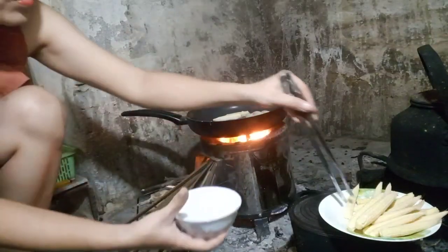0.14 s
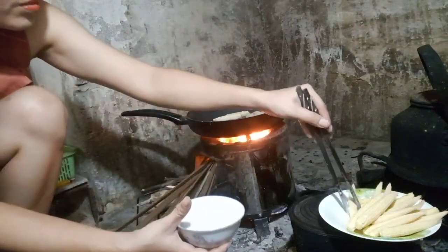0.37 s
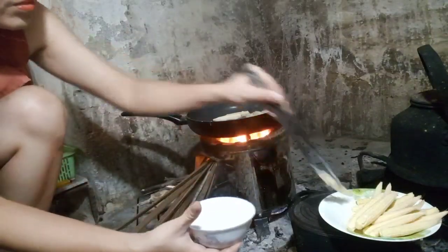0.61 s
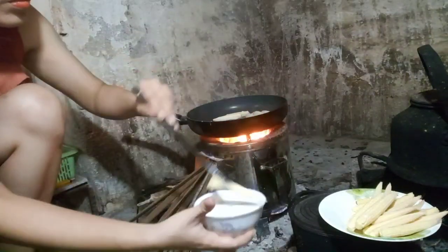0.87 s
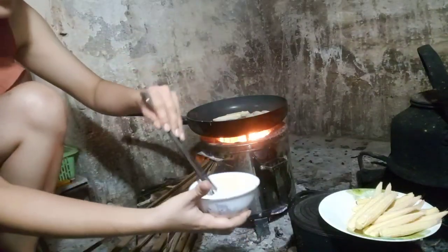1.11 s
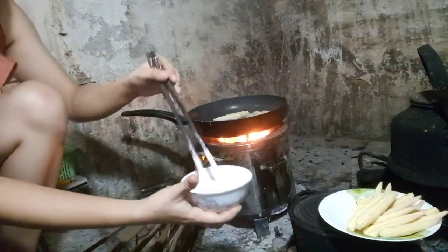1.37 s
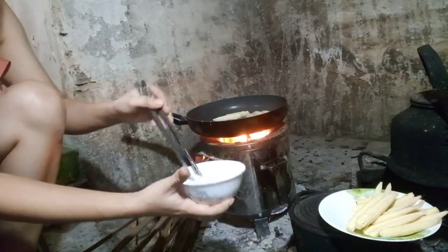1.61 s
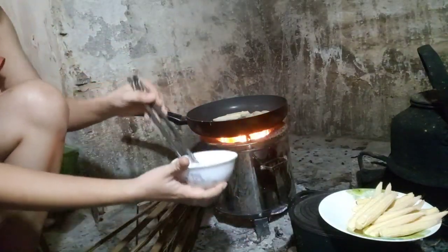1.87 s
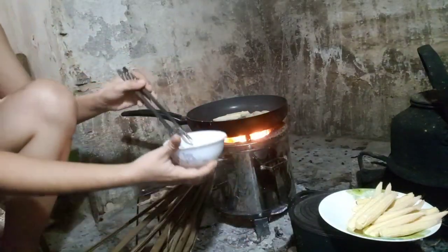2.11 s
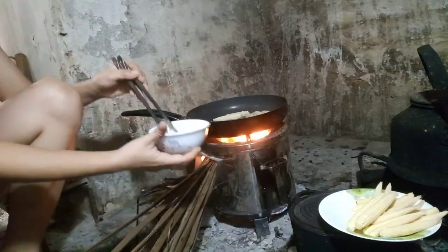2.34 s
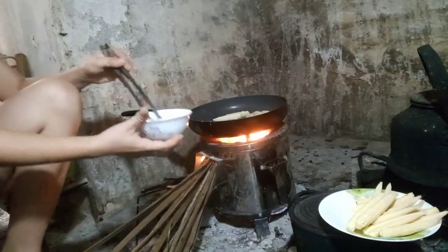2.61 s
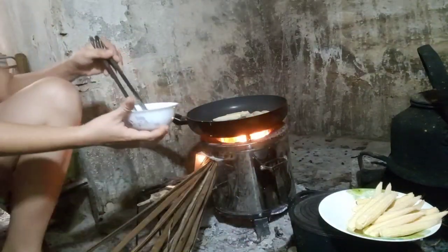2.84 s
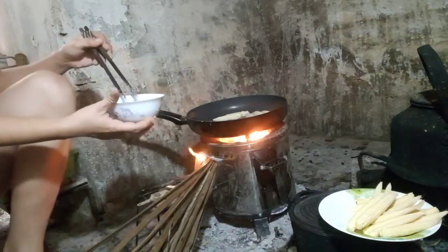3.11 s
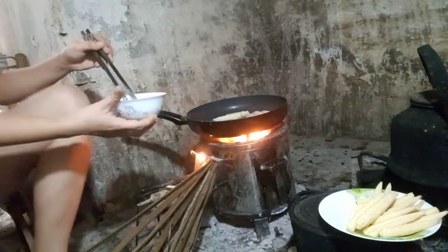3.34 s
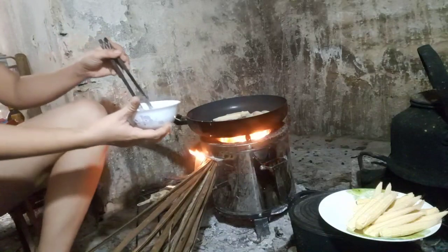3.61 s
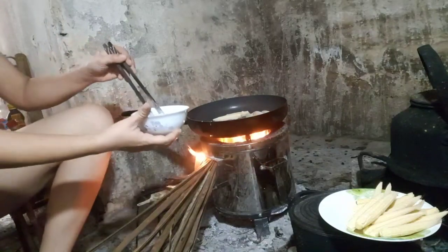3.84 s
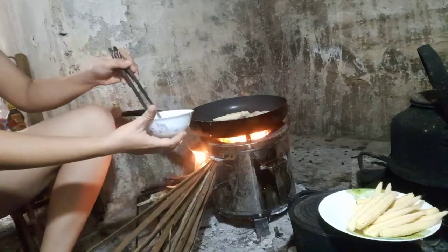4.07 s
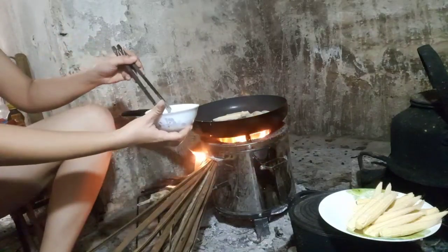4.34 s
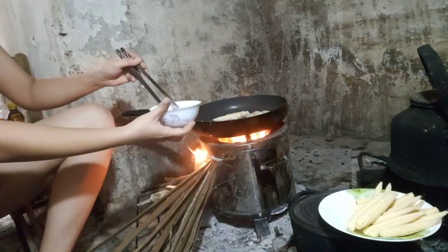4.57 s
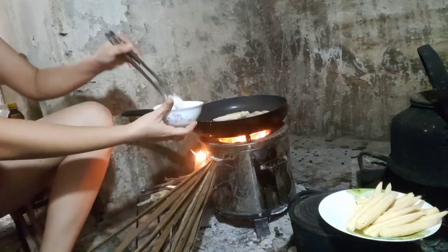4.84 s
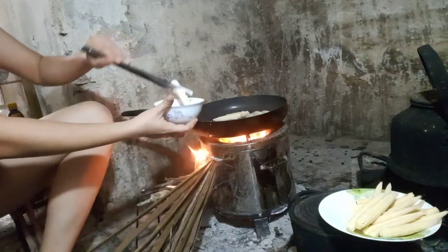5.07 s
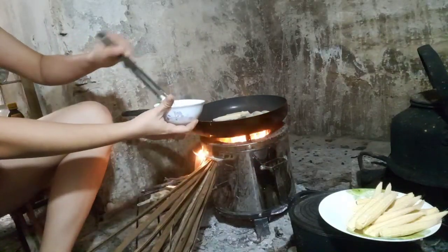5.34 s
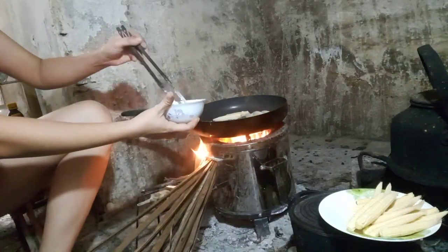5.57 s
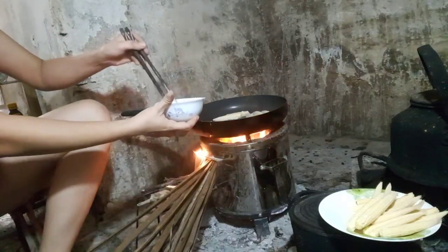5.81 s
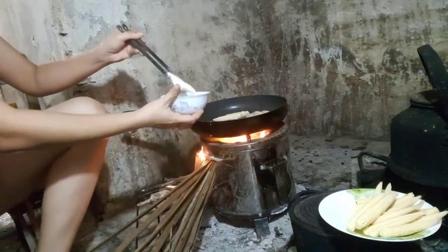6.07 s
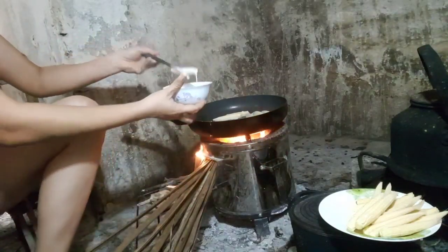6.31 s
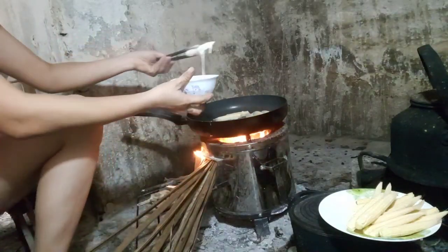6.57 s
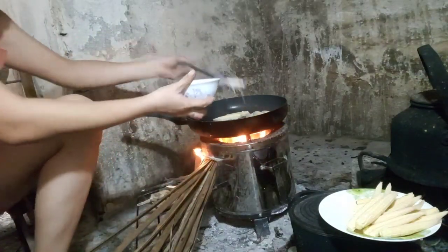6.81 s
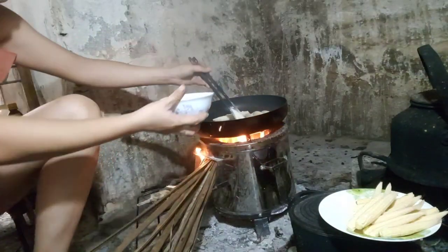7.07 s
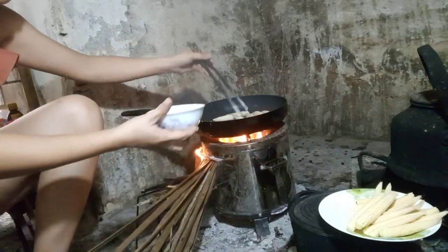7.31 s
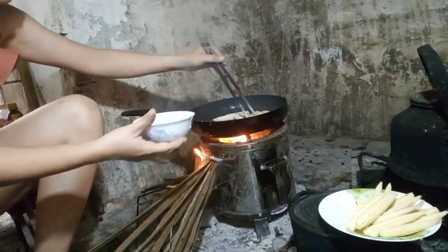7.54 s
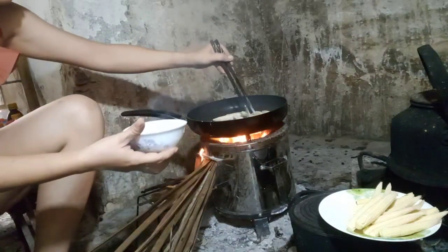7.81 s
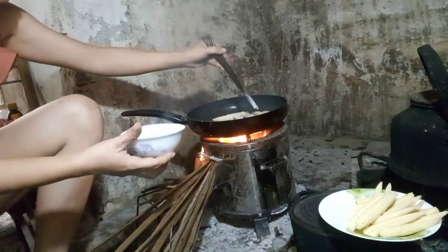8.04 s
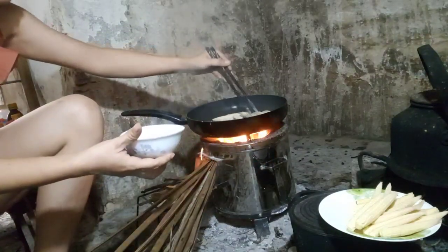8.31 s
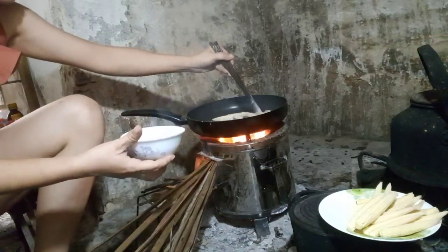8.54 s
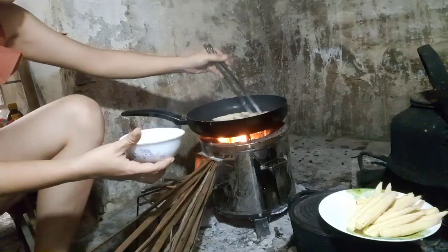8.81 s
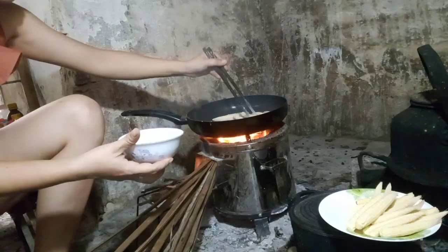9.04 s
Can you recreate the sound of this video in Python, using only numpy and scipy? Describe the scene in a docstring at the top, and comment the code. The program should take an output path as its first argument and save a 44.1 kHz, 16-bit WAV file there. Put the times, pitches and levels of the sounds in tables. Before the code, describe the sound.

A pan of battered food fries over a wood stove in a hard-walled corner, heard close in stereo with slight reverberation. The fire rumbles strongest at first, then sinks to a faint murmur. Early dull knocks, short scrapes and a bowl tap give way to steady sizzling and random spits. After seven seconds fresh batter makes the oil surge, with pan knocks and a very sharp pop just past eight seconds.

```python
"""Battered vegetables fry in a pan on a wood stove in a bare corner: bubbles burst as noise spits with
ringing cavities, large ones as single pops, small ones as sizzle and crackle over a noise hiss.
Chopsticks knock the pan, tap a bowl and scrape, as damped tones and resonances struck by noise.
The fire's draught rumbles and roars as shaped noise over a deep murmur; low sine tones waver as a hum."""
import sys
import numpy as np
from scipy import signal
from scipy.fft import rfft, irfft
from scipy.io import wavfile
from scipy.ndimage import uniform_filter1d

SR = 44100
rng = np.random.default_rng(int(sys.argv[2]) if len(sys.argv) > 2 else 0)


def voltage_ratio(level):
    """Linear amplitude factor for a level in decibels (scalar or array-like)."""
    return 10 ** (np.asarray(level, float) / 20)


def transcribe(u):
    """Save the signal u as a 16-bit wav file named by the first command-line argument.

    u: samples, shape (n,) or (channels, n), limited to [-1, 1]; the rate is SR.
    q: integer samples, one column per channel.
    """
    v = np.clip(np.atleast_2d(u).T, -1, 1)
    q = np.round(v * 32767).astype(np.int16)
    wavfile.write(sys.argv[1], SR, q)


N = 403956

# Large bubbles bursting. Each row: start in seconds, peak in dB before reflections, cavity pitch in Hz,
# left-right difference in dB, share of cavity ring 0-1.
LARGE_BUBBLES = [(0.015, -28, 12200, -4, 0.3), (0.055, -28, 14500, -4, .05), (0.183, -21, 4070, 0, 1),
                 (.227, -36, 4370, 1, 0.6), (.251, -27, 6600, 0, 0.1), (.34, -24, 9000, -4, 0.1),
                 (0.351, -23.5, 3600, 3.5, 0.9), (0.427, -20, 14100, 0, 0), (0.5007, -28, 4270, 0, 0.5),
                 (0.588, -27, 4500, -1, 0.04), (0.7792, -27, 5500, -3, 0.05), (0.885, -40, 6350, -1, .1),
                 (0.9056, -9.5, 12400, 0.5, 0.32), (0.9054, -24, 2300, 2, 0.9),
                 (1.0154, -27, 12600, -2, 0.3), (1.078, -27.5, 6020, 1, 0.9),
                 (1.2082, -39, 12400, -1.5, 0.5), (1.332, -26, 6000, -.5, 0.13), (1.48, -41, 4860, -3, 0.3),
                 (1.506, -18, 12000, 1, 0), (1.5482, -24.5, 3820, 1, 0.14), (1.596, -22, 12000, 1, 0.04),
                 (1.6187, -27, 3730, -4, 0.16), (1.803, -30.5, 4830, 2, 0.5), (1.88, -26, 9400, 0, 0.4),
                 (1.94, -23.5, 9300, -1, 0.27), (2.1385, -21, 2080, -2, 0.17),
                 (2.2453, -29.5, 11900, -1.5, 0.5), (2.323, -26, 11400, 1, .27),
                 (2.6167, -25, 7140, -1, 0.18), (2.72, -31.5, 5950, 3, .2), (2.7981, -18.5, 11600, 1, 0),
                 (3.0829, -40, 11900, -1, 0.3), (3.1567, -26, 6800, 2, 0.07), (3.202, -22.5, 4350, 1, 0.1),
                 (3.2373, -24, 14100, -1, 0.4), (3.295, -32, 5000, -.5, 0.1), (3.465, -31, 4000, 4, 0),
                 (3.4749, -20.5, 11200, -1, 0.23), (3.476, -28, 4200, -3, .9),
                 (3.5093, -23.5, 4840, 2, 0.02), (3.621, -22.5, 8400, -2.5, 0.5),
                 (3.675, -26.5, 3820, -1, 0.14), (3.704, -26, 9500, -8, 0.3), (3.777, -18, 9800, 0, 0),
                 (3.788, -22, 12000, 2, 0.3), (3.793, -22.5, 8900, 0, 0.26), (3.799, -30, 11000, -2, 0.2),
                 (3.9763, -27.5, 11800, -1.5, 0), (4.01, -25.5, 4700, -.5, 0.1),
                 (4.038, -29, 12100, -5, 0.2), (4.13, -23.5, 12800, -1, 0.3), (4.275, -31, 6950, 0, 0.15),
                 (4.35, -26, 12900, -2, 0.03), (4.41, -31, 4800, -3, 0.4), (4.481, -23, 12200, 0, 0.06),
                 (4.5034, -20.5, 4470, 1, 0.06), (4.836, -29, 11800, -2, 0.55), (4.825, -37, 4600, 0, .9),
                 (4.868, -35, 3670, 0, 1), (4.888, -38, 3500, 0, 0.4), (5.083, -40, 2980, 0, 0.4),
                 (5.367, -40, 3570, 0, 1), (4.9081, -28.5, 5800, 1, 0), (5.166, -29.5, 14300, 0, 0.1),
                 (5.209, -31, 9000, 0, 0), (5.2164, -24.5, 4480, -1, 0.06), (5.236, -36, 4500, -2, 0.4),
                 (5.3316, -33, 7230, 1, .1), (5.441, -36, 4860, -3, 0.7), (5.537, -32, 14600, 1, 0),
                 (5.555, -32, 12000, 2, 0), (5.648, -39, 3000, 0, 0.5), (5.718, -35, 2500, 1, .7),
                 (5.669, -33.5, 3080, 0, 0.9), (5.7622, -25, 12000, 1, 0.2), (5.7774, -19, 11000, 0, 0.3),
                 (5.892, -26.5, 14000, -3, .4), (5.9241, -15, 5400, -1, 0.15), (6.006, -31, 5540, -.5, 0.6),
                 (6.052, -39, 2300, .5, 0.27), (6.139, -27.5, 14700, 0, 0.25), (6.434, -33, 12400, -3, 0.4),
                 (6.522, -34, 2380, 0, 0.34), (6.564, -29, 14000, -4, 0.1), (6.6185, -22, 11600, 1, 0.13),
                 (6.8043, -22, 7100, -2, 0.44), (6.856, -24, 3300, 1, 0.14), (6.9032, -25.5, 13700, 0, 0.1),
                 (7.001, -22.5, 11100, -1, 0.3), (7.09, -25.5, 13900, -6, 0.05),
                 (7.245, -21.5, 11800, -7, 0.3), (7.426, -19, 2770, 8, 0.07), (7.5252, -21, 4940, -3, 0.08),
                 (7.876, -17, 14000, 2, 0.6), (7.996, -19.5, 2740, 2, 0.08), (8.102, -19.5, 9600, -1, 0.24),
                 (8.235, -23.5, 11900, -1.5, 0.14), (8.287, -25, 3800, -2, 1), (8.3256, -3, 12200, -1, 0.5),
                 (8.5345, -24, 14400, 0, 0.2), (8.5586, -11.5, 2820, 1, 0.18),
                 (8.6155, -18.5, 6500, -2, 0.25), (8.64, -25, 4370, 1, 0.2), (8.6998, -28.5, 4460, 2, 0.4),
                 (8.783, -26.5, 4760, -3, 0.5), (8.9418, -18.5, 2160, 0, 0.2), (8.957, -19, 3200, 1, 0.17),
                 (8.9908, -12, 12300, 0.5, 0.04), (9.0206, -19, 5120, 1, 0.07),
                 (9.068, -30.5, 2350, -3, 0.4), (9.096, -26, 13000, 4, 0), (9.1534, -14.5, 5370, 0, 0.22)]
# How hard the oil fries; it surges when fresh batter goes in. Each row: time in seconds, hiss level in dB.
FRYING = [(0, -48), (.1, -53.5), (1.76, -53.5), (2.55, -56), (3.16, -54), (3.34, -52), (3.98, -51.5),
          (4.21, -53.5), (5.64, -54), (6.28, -52.5), (6.89, -53), (7.02, -49.5), (7.42, -45.5),
          (8.21, -48.5), (8.49, -46), (8.57, -42.5), (8.66, -43), (8.75, -48.5), (8.98, -50), (9.16, -43)]
# Colour of oil, pan and microphone. Each row: frequency in Hz, relative level in dB per Hz.
FIZZ_COLOUR = [(240, -25.5), (400, -4), (618, -8.5), (899, -6.5), (1330, -6.5), (1570, -10.5), (1780, -5),
               (2250, -3.5), (3760, -3), (5730, -1), (7940, -4), (13900, -1), (15550, -5), (15750, -70)]
# Top end of large pops, reaching higher than the sizzle. Each row: frequency in Hz, relative dB per Hz.
POP_TOP = [(15550, -9), (15800, -30), (16550, -36), (16750, -70)]
# Dull knocks. Each row: start in seconds, body level in dB, body pitch in Hz, time held before damping
# in seconds, share of the pan's response 0-1.
KNOCKS = [(.048, -33.5, 280, 0.011, 0.05), (0.315, -27.5, 267, 0.019, 0.14),
          (.406, -25, 279.5, 0.011, 0.07), (1.179, -40.5, 275, 0.0089, .3), (3.512, -38, 268, 0.0045, 0.2),
          (3.915, -43, 199, 0.0076, 0.33), (6.931, -44.5, 397, 0.003, 0.35), (6.97, -50, 450, 0.0028, 0.14),
          (7.148, -34.5, 303, 0.003, 0.41), (7.168, -41, 480, 0.0053, 0.15), (7.269, -50, 267, 0.0055, .2),
          (7.675, -43, 292, 0.005, 0.3), (7.713, -44, 353, 0.0033, 0.15), (7.812, -50, 330, 0.0041, 0.4),
          (8.328, -30, 342, 0.0072, 0.55), (8.529, -41, 356, 0.005, 0.58), (8.929, -30, 316, 0.012, 0.74),
          (8.954, -36.5, 319, 0.0215, .1)]
# Pan modes. Each row: frequency in Hz, level in dB before tilt, t60 in seconds.
PAN_MODES = [(220, -8, .25), (245, -2, .35), (272, 3, .38), (298, 4, .42), (327, 2, .42), (368, -1, .35),
             (410, -4, .22), (480, -7, .08), (560, -1, .09), (700, -9, .05), (830, -3, .06), (950, -2, .05),
             (1150, -9, .04), (1400, -11, .035), (1650, -4, .04), (1900, -5, .035), (2200, -4, .03),
             (2450, -7, .03)]
# Chopsticks on the bowl. Each row: start in seconds, peak in dB before reflections, left-right difference
# in dB, damping of upper modes in dB per octave, freedom to ring 0-1.
TAPS = [(.407, -30.5, 6, -9, 0), (1.665, -23.5, 2, 12.5, 0.16), (2.138, -34.5, 5, -10, 1),
        (2.235, -34.5, 6, 15, 0.05), (3.465, -38.5, 0, 29, 0), (8.93, -26.5, -13, 19, 0.02)]
# Bowl modes. Each row: frequency in Hz, level in dB before tilt, t60 in seconds when ringing freely.
BOWL_MODES = [(810, 3.5, 0.14), (1583, 8, 0.2), (1790, -1, .14), (1900, 5, 0.17), (1990, 19, .2),
              (2050, 7, 0.2), (2100, 14, .18), (2200, 18, 0.19), (2300, 8, 0.15), (2480, 2, .08),
              (3130, -4, 0.24)]
# Chopsticks dragging over food and plate. Each row: start in seconds, end in seconds, start resonance in Hz,
# end resonance in Hz, level in dB.
SCRAPES = [(0.018, 0.102, 2740, 2200, -50), (0.192, 0.263, 4320, 4540, -48.5),
           (0.358, 0.398, 3900, 3930, -45.5), (0.36, 0.455, 2150, 2100, -45.5),
           (3.297, 3.32, 2390, 2260, -45), (3.36, 3.382, 1950, 1950, -55),
           (3.391, 3.428, 1860, 2300, -51.5), (5.628, 5.78, 2300, 2600, -57.5)]
# The fire's draught. Each row: time in seconds, rumble level in dB before flutter.
DRAUGHT = [(0, -39), (.28, -43.5), (.56, -52), (.79, -47.5), (.92, -49.5), (1.2, -47), (1.38, -46),
           (1.91, -51.5), (2.63, -52.5), (3.16, -55.5), (3.6, -55), (5, -56), (6.45, -55.5), (6.91, -58),
           (7.8, -55), (8.55, -52.5), (8.75, -57), (9.16, -54)]
# Draught rumble spectrum. Each row: frequency in Hz, relative level in dB per Hz.
RUMBLE_COLOUR = [(15, -60), (30, -29), (45, -16), (60, 1), (78, -5.5), (102, -1.5), (140, 0), (172, -7.5),
                 (200, -9), (260, -14), (440, -120)]
# Draught roar spectrum. Each row: frequency in Hz, relative level in dB per Hz.
ROAR_COLOUR = [(110, -45), (180, -11), (221, 1.5), (280, 4), (366, 4), (618, -10.5), (1290, -11.5),
               (1500, -14), (1950, -12), (3300, -120)]
# Standing waves of the corner. Each row: frequency in Hz, width in Hz, boost in dB.
STANDING_WAVES = [(67.4, 8.9, 7.5), (93, 12.5, 9), (113, 15.4, 9.5), (144.7, 9.9, 6), (173.5, 9.2, 6),
                  (275, 14, 4.5)]
# Low tones that swell and fade. Each row: start in seconds, length in seconds, starting pitch in Hz,
# level in dB before waver.
HUM_TONES = [(0, .22, 149, -43), (.78, .17, 125, -51), (1.15, .3, 120, -54), (2.08, .08, 149, -48),
             (2.2, .4, 131, -58), (3.55, .2, 97, -58), (3.9, .6, 105, -56), (4.65, 1, 107, -57),
             (5.6, 1.15, 95, -58), (5.8, .75, 136, -59), (7.25, .2, 100, -58), (7.6, .35, 105, -57)]
# Steady deep murmur of the surroundings. Each row: frequency in Hz, relative level in dB per Hz.
MURMUR_COLOUR = [(10, -22), (22, -17), (40, -4), (62, 1.5), (85, -1.5), (140, -38.5)]
# Likeness of left and right. Each row: frequency in Hz, correlation -1 to 1.
LIKENESS = [(40, 0.46), (120, 0.93), (300, 0.72), (500, 0.49), (800, 0.13), (1650, 0.25), (4970, -0.44),
            (15000, -0.0014)]
# Decay of the corner. Each row: frequency in Hz, t60 in seconds.
CORNER_DECAY = [(250, 0.74), (800, 0.6), (2000, 0.35), (5000, 0.31), (12000, 0.23)]
# Answers of pan rim, stove and wall. Each row: nominal delay in ms, level in dB over the near scatter.
ECHOES = [(2.602, -9.5), (5, -5.5), (7.2, -7)]
# Difference of the two microphones. Each row: frequency in Hz, left-right difference in dB.
MIC_LEAN = [(60, 2.5), (500, -0.6), (4000, 1), (8000, -0.5), (14000, -2)]


def evened(x):
    """Scales to rms 1."""
    return x / np.sqrt(np.mean(x ** 2) + 1e-20)


def wander(x, size):
    """Slow random drift of rms 1: noise averaged twice."""
    return evened(uniform_filter1d(uniform_filter1d(x, size=size), size=size))


def read(points, hz):
    """Reads a spectrum on a log-frequency axis."""
    f, value = np.transpose(points)
    return np.interp(np.log(hz + 1), np.log(f + 1), value)


def curve(rows):
    """Reads a control curve at every sample."""
    return np.interp(np.arange(N) / SR, *np.transpose(rows))


def add(mix, start_s, sound, pan_db):
    """Places a sound between the microphones; the left one is a little farther, 3 samples."""
    for side, lag, db in ((0, 3, pan_db / 2), (1, 0, -pan_db / 2)):
        part = mix[side, round(start_s * SR) + lag:][:len(sound)]
        part += voltage_ratio(db) * sound[:len(part)]


def ring(x, hz, width_hz):
    """One damped resonance, scaled to peak 1."""
    r = np.exp(-np.pi * width_hz / SR)
    turn = 2 * np.pi * min(hz, 0.45 * SR) / SR
    y = signal.lfilter([1, 0, -1], [1, -2 * r * np.cos(turn), r * r], x)
    return y / abs(y).max()


def modes(table, t, tilt_db=0, free=1):
    """A struck object's dying tones, scaled to peak 1; tilt is in dB per octave about 1400 Hz."""
    y = 0
    for hz, db, t60_s in table:
        level_db = db - tilt_db * np.log2(hz / 1400) - 60 * t / (t60_s * free)
        y = y + voltage_ratio(level_db) * np.sin(2 * np.pi * hz * t)
    return y / abs(y).max()


def highpass(x, hz):
    """First-order bass cut."""
    return signal.lfilter([1, -1], [1, -np.exp(-2 * np.pi * hz / SR)], x)


def colour(points):
    """Minimum-phase filter with the given spectrum."""
    log_gain = np.log(voltage_ratio(np.maximum(read(points, np.fft.rfftfreq(4096, 1 / SR)), -100)))
    full = np.concatenate([log_gain, log_gain[-2:0:-1]])
    return np.fft.ifft(np.exp(np.conj(signal.hilbert(full)))).real[:2048]


def noise(points, patchy_db, resonances=()):
    """Two-channel noise of rms 1 in drifting patches, left and right alike as LIKENESS says."""
    frames, hz = N // 2048 + 5, np.fft.rfftfreq(8192, 1 / SR)
    a, b, c, d, patches = rng.standard_normal((frames, 4097, 5)).T
    patches = evened(uniform_filter1d(uniform_filter1d(patches, size=40, axis=0), size=2, axis=1))
    same = np.clip(read(LIKENESS, hz), -1, 1)[:, None]
    left = a + 1j * b
    z = np.array([left, same * left + np.sqrt(1 - same ** 2) * (c + 1j * d)])
    shape_db = read(points, hz)
    for f, width, db in resonances:
        shape_db = shape_db + db / (1 + (2 * (hz - f) / width) ** 2)
    z *= voltage_ratio(shape_db[:, None] + patchy_db * patches)
    return evened(signal.istft(z, nperseg=8192, noverlap=6144)[1][:, :N])


def burst(shake, hz, share, spit_ms):
    """A bubble's skin snaps with a little spit of noise, and its cavity rings for a few cycles."""
    t = np.arange(len(shake)) / SR - 0.0007  # the snap comes 0.7 ms in
    spit = 0.093 * shake * np.exp(-1000 * abs(t) / max(spit_ms, 0.1))
    spit[np.argmin(abs(t))] = 1
    share = np.clip(share, 0, 1)
    return (1 - share) * spit + share * ring(spit, hz, 0.2 * hz)


def pops():
    """The large bubbles, one by one; a bigger, lower bubble keeps more of its bass."""
    mix = np.zeros((2, N))
    tint = colour(FIZZ_COLOUR[:-2] + POP_TOP)[:256]
    shakes = rng.standard_normal((len(LARGE_BUBBLES), 800))
    for (start_s, db, hz, pan_db, share), shake in zip(LARGE_BUBBLES, shakes):
        thin = highpass(tint, min(2200, 0.19 * hz))
        spit_ms = 0.2 + 0.02 * (db + 29)  # louder bubbles spit longer
        pop = np.convolve(burst(shake, hz, share, spit_ms), thin)
        add(mix, start_s, voltage_ratio(db) * pop / abs(pop).max(), pan_db)
    return mix


def sizzle(per_s, spread_db, share, biggest, kinds=24):
    """Small bubbles at random instants, exponentially spread in dB up to biggest * spread_db; rms 1."""
    mix = np.zeros((2, N))
    size_db = spread_db * np.minimum(rng.exponential(1, N), biggest)
    size = voltage_ratio(size_db) * (rng.random(N) < per_s / SR)
    kind = rng.integers(0, kinds, N)
    for k, hz in enumerate(np.geomspace(2000, 15000, kinds)):
        grain = evened(burst(rng.standard_normal(300), hz, share, spit_ms=0.78))
        add(mix, 0, signal.oaconvolve(size * (kind == k), grain), 3 * rng.standard_normal())
    mix = highpass(mix, 1040)  # small bubbles carry no bass
    return evened(signal.oaconvolve(mix, colour(FIZZ_COLOUR)[None], axes=1)[:, :N])


def hiss():
    """The finest bubbles merge into patchy noise."""
    return noise(FIZZ_COLOUR, patchy_db=1.0)


def knocks():
    """A soft push rings the body until damped; the pan adds a wide crack, rattles and rocks back."""
    rise_s, release_s, lean_db = 0.00082, 0.0026, 0.5
    bounce_s, bounce = 0.039, 0.86
    mix, t = np.zeros((2, N)), np.arange(SR // 2) / SR
    for (start_s, db, hz, held_s, pan), shake in zip(KNOCKS, rng.standard_normal((len(KNOCKS), len(t)))):
        envelope = (1 - np.exp(-t / rise_s)) * np.exp(-np.maximum(t - held_s, 0) / release_s)
        body = (1 - 0.14 * pan) * np.sin(2 * np.pi * hz * t) * envelope
        crack = ring(ring(shake * np.exp(-t / 0.035), 356, 240), 270, 1780)
        tilt_db = 0.54 * (-35.0 - db)  # softer knocks are duller
        rattle = signal.fftconvolve(shake * np.exp(-t / 0.036), modes(PAN_MODES, t, tilt_db))[:len(t)]
        blow = body + pan * (1.24 * crack + rattle / abs(rattle).max())
        add(mix, start_s, voltage_ratio(db) * blow, lean_db)
        add(mix, start_s + bounce_s, voltage_ratio(db) * bounce * pan * (body + 0.37 * crack), lean_db)
    return mix


def taps():
    """A hard tick, and a short chatter of the sticks on the rim that rings the bowl modes."""
    mix, t = np.zeros((2, N)), np.arange(SR // 4) / SR
    for (start_s, db, pan_db, damp_db, free), shake in zip(TAPS, rng.standard_normal((len(TAPS), len(t)))):
        chatter = 0.038 * np.clip(free, 0, 1) * shake * np.exp(-t / 0.028)
        chatter[0] = 1
        bowl = signal.fftconvolve(chatter, modes(BOWL_MODES, t, damp_db, max(free, 0.05)))[:len(t)]
        tick = ring(np.exp(-t / 0.0001), 1700, 1600)
        tap = bowl / abs(bowl).max() + 0.12 * tick
        add(mix, start_s, voltage_ratio(db) * tap / abs(tap).max(), pan_db)
    return mix


def scrapes():
    """Uneven little slips excite a broad resonance that crossfades from start to end pitch."""
    mix = np.zeros((2, N))
    for start_s, end_s, start_hz, end_hz, db in SCRAPES:
        n = round((end_s - start_s) * SR)
        slips = rng.standard_normal(n) * (rng.random(n) < 800 / SR)
        fade = np.linspace(0, 1, n)
        rub = (1 - fade) * evened(ring(slips, start_hz, 360)) + fade * evened(ring(slips, end_hz, 240))
        add(mix, start_s, voltage_ratio(db) * rub * signal.windows.tukey(n, 0.6), 0)
    return mix


def fire():
    """Rumble and roar of the draught, coloured by the corner's standing waves."""
    draught_db = curve(DRAUGHT)
    flutter = wander(rng.standard_normal(N), 3000)  # the flames flap
    rumble_db = draught_db + 0.99 * flutter
    roar_db = -57.5 + 1.03 * (draught_db + 50.5) + 1.96 * flutter
    rumble = voltage_ratio(rumble_db) * noise(RUMBLE_COLOUR, 0.6, STANDING_WAVES)
    roar = voltage_ratio(roar_db) * noise(ROAR_COLOUR, 1.0, STANDING_WAVES)
    return rumble + roar


def hum():
    """Each tone creeps upward, wavers in pitch and level, and fades in and out."""
    rise_hz_per_s, waver_hz, waver_db = 3.5, 4, 3.2
    mix = np.zeros(N)
    pitch_drift, level_drift = (wander(v, 1100) for v in rng.standard_normal((2, N)))
    for start_s, length_s, start_hz, db in HUM_TONES:
        a, n = round(start_s * SR), round(length_s * SR)
        hz = start_hz + rise_hz_per_s * np.arange(n) / SR + waver_hz * pitch_drift[a:a + n]
        tone = np.sqrt(2) * np.sin(2 * np.pi * np.cumsum(hz) / SR)
        mix[a:a + n] += voltage_ratio(db) * tone * signal.windows.tukey(n, 0.4)
    return mix * voltage_ratio(waver_db * level_drift)


def murmur():
    """Steady deep noise of the surroundings."""
    return voltage_ratio(-62) * noise(MURMUR_COLOUR, patchy_db=0.59)


def reflections(near_db, far_db):
    """Direct sound, quick colourless scatter nearby, then sparse taps whose bands die at their own speed."""
    near_t60_s = 0.024  # dense scatter inside pan and stove
    sparse = np.zeros((2, SR // 2))
    at = np.arange(6, SR // 2 - 12, 12) + rng.integers(0, 12, (2, (SR // 2 - 7) // 12))
    np.put_along_axis(sparse, at, rng.choice([-1., 1.], at.shape), 1)
    hz, t, z = signal.stft(sparse, SR, nperseg=512)
    same = np.clip(read(LIKENESS, hz), -1, 1)[:, None]  # long waves reach both microphones alike
    z[1] = same * z[0] + np.sqrt(1 - same ** 2) * z[1]

    near = signal.istft(z, SR, nperseg=512)[1][:, :2048] * voltage_ratio(-60 * np.arange(2048) / SR / near_t60_s)
    near *= voltage_ratio(near_db) / np.linalg.norm(near[0])
    near[:, 0] = 1  # direct sound
    for ms, db in ECHOES:
        at = np.rint(ms * rng.uniform(0.85, 1.15, 2) * SR / 1000).astype(int)
        near[[0, 1], at] += voltage_ratio(db + near_db)
    spectrum = rfft(near, 4096)
    spectrum *= np.linalg.norm(near[0]) / np.sqrt(uniform_filter1d(abs(spectrum) ** 2, size=60))

    tail = signal.istft(z * voltage_ratio(-60 * t / read(CORNER_DECAY, hz)[:, None]), SR, nperseg=512)[1]
    tail *= voltage_ratio(far_db) / np.linalg.norm(tail[0])
    tail[:, :2048] += irfft(spectrum)[:, :2048]
    spectrum = rfft(tail)  # level out medium-width bands
    power = abs(spectrum) ** 2
    levelling = np.sqrt(uniform_filter1d(power, size=2500) / uniform_filter1d(power, size=350))
    return irfft(spectrum * levelling)


def corner(dry, near_db, far_db, count=4):
    """Reflections of count spots take turns every 2500 samples, crossfaded, so they keep changing."""
    spot = (np.arange(N) // 2500) % count
    wet = 0
    for k in range(count):
        part = dry * uniform_filter1d(1. * (spot == k), size=300)
        wet = wet + signal.oaconvolve(part, reflections(near_db, far_db), axes=1)[:, :N]
    return wet


def scene():
    """Oil bubbles and blows sound in the corner; hiss, fire, hum and murmur are added directly."""
    bubbles = corner(pops(), near_db=-2.0, far_db=0.0)
    fine = evened(corner(sizzle(per_s=300, spread_db=5.2, share=0.079, biggest=3.9), 0.57, 13.2))
    crackle = evened(corner(sizzle(per_s=60, spread_db=3.8, share=0.56, biggest=2.34), 0, 0))
    oil = voltage_ratio(2.5) * fine + voltage_ratio(-7.0) * crackle + hiss()
    blows = corner(knocks() + taps() + scrapes(), near_db=-9, far_db=-10)
    return bubbles + voltage_ratio(curve(FRYING)) * oil + blows + fire() + hum() + murmur()


def top_cut(x):
    """Nothing passes above the cut-off."""
    return signal.sosfilt(signal.butter(12, 16720, fs=SR, output="sos"), x)


def record(dry):
    """Two unlike microphones: half the spectral difference goes to each side."""
    lean_db = read(MIC_LEAN, np.fft.rfftfreq(N, 1 / SR)) * np.array([[0.5], [-0.5]])
    mix = irfft(rfft(dry) * voltage_ratio(lean_db), N)
    return top_cut(mix)


dry = scene()
out = record(dry)
transcribe(out)
```